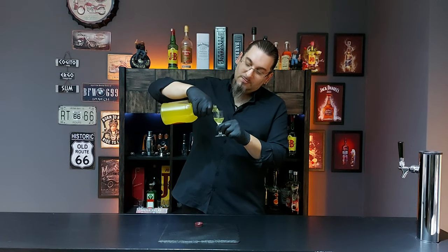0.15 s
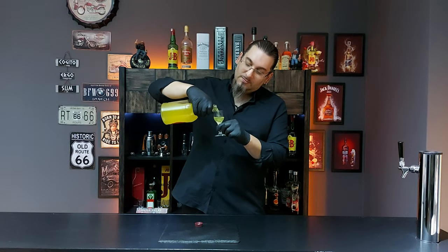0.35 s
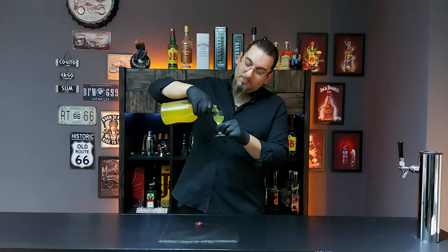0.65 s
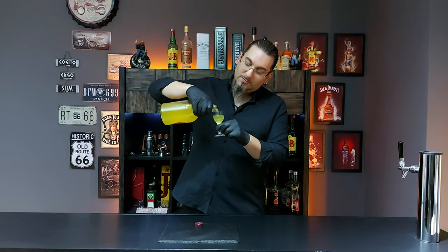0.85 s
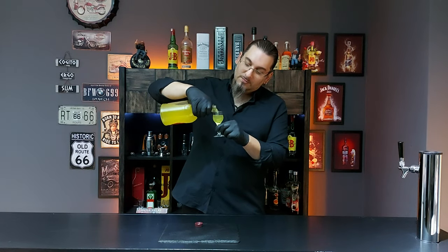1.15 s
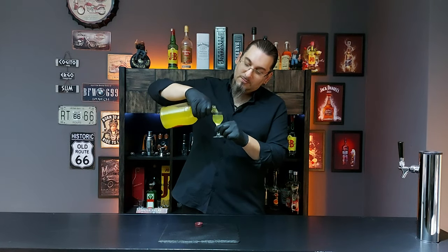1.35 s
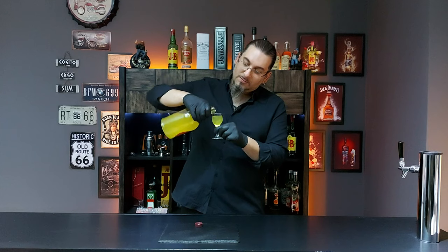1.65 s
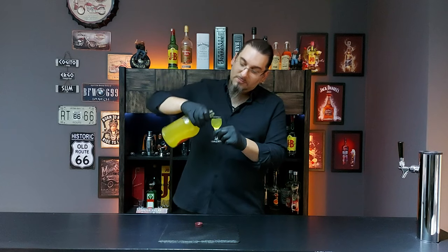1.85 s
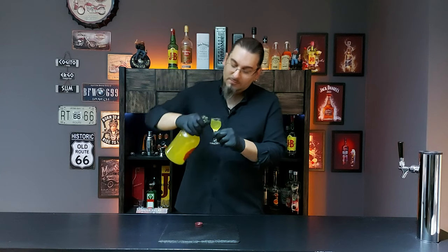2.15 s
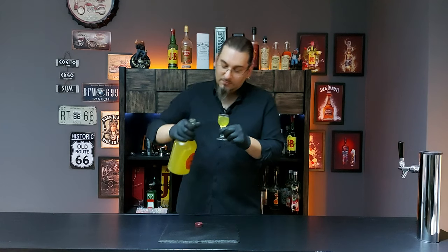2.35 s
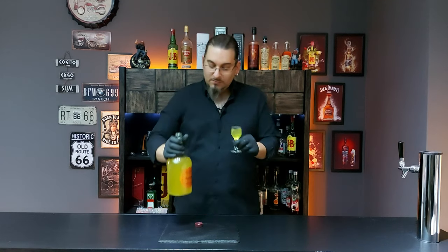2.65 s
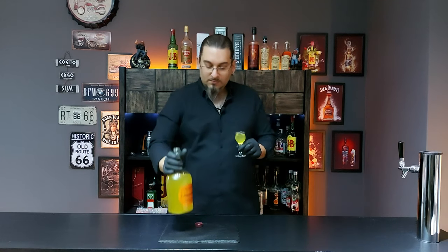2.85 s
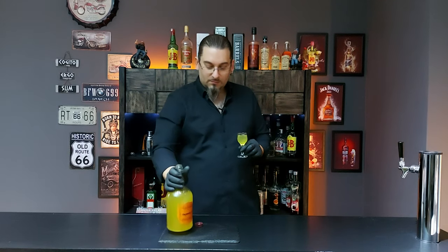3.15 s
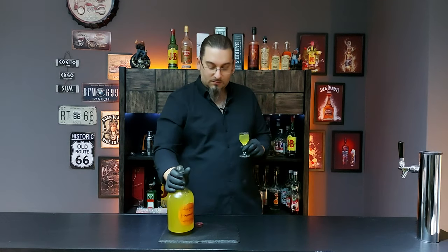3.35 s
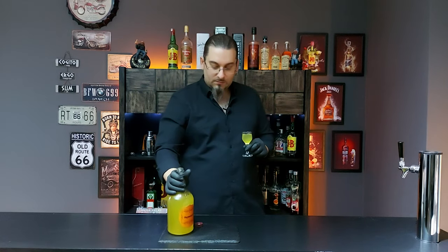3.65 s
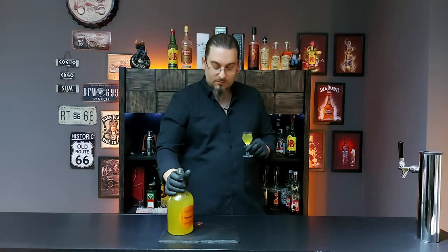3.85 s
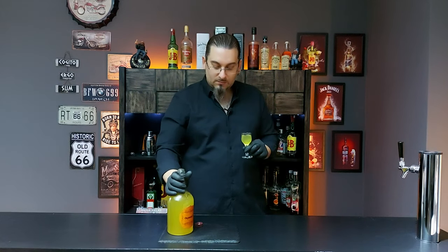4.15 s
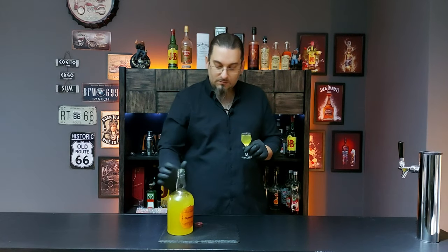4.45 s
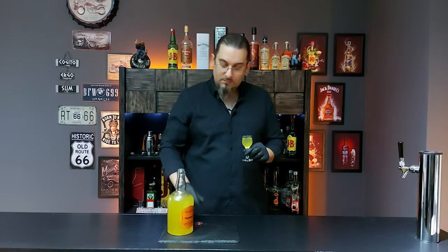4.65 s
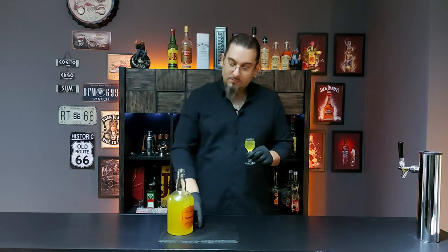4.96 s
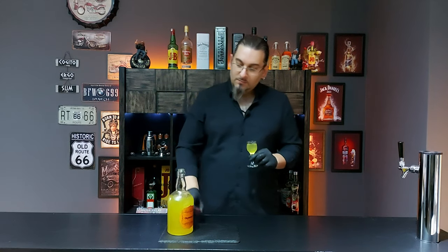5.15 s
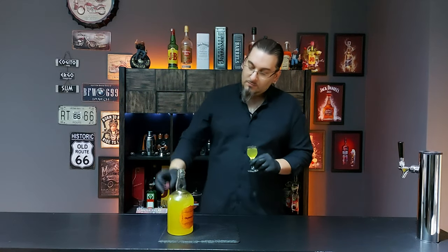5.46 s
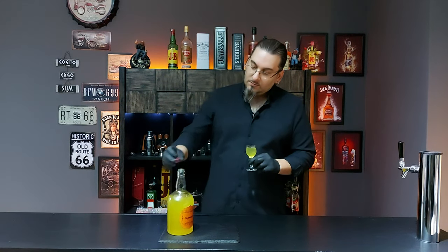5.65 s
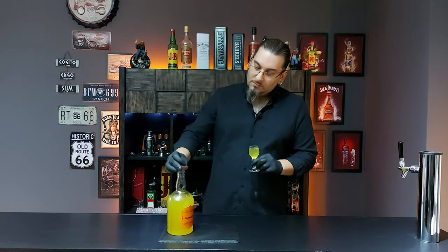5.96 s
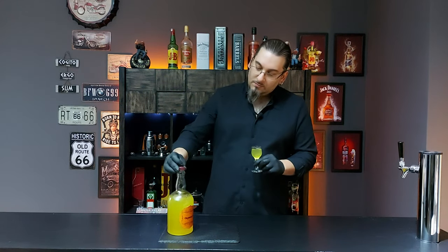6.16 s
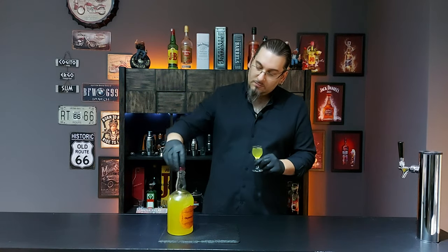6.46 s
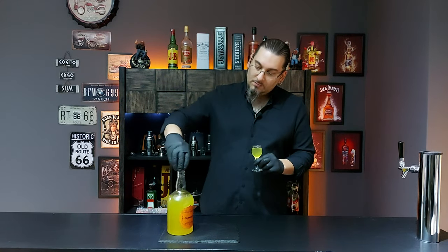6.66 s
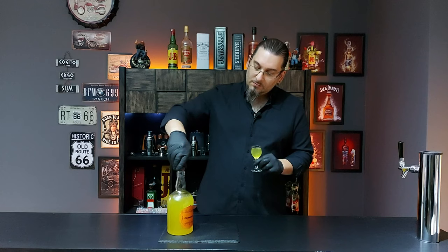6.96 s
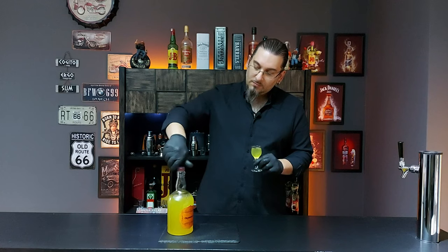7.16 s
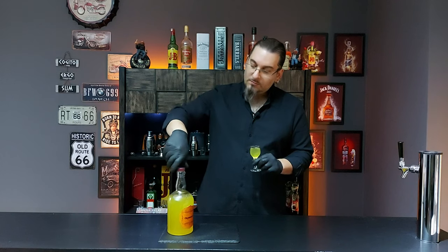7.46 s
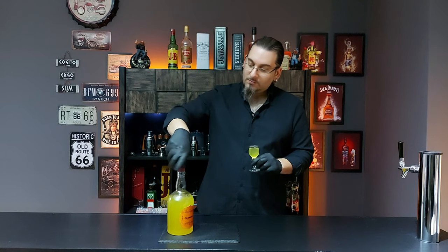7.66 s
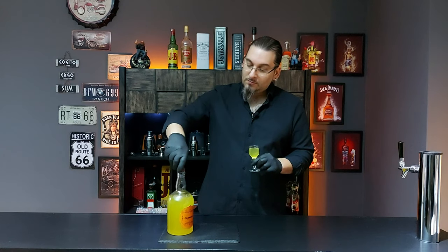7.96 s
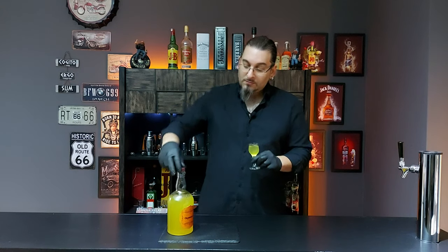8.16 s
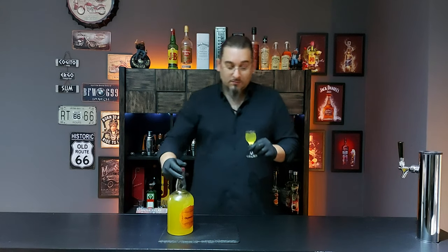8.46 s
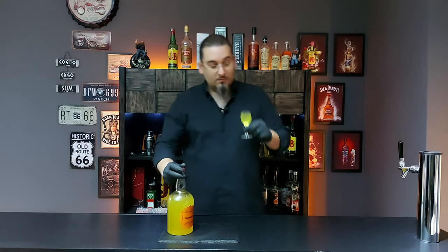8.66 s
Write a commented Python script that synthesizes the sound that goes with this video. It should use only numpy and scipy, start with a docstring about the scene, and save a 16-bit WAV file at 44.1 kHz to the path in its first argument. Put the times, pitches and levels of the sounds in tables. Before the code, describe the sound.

About seven quick glugs with wet, ringing bubbles fade into a small plop, then a clear glass clink. After a rustling pause, two heavy thumps on the counter, the second knockier. Small clicks and a brief scrape follow as the cap is picked up and pressed on, with muffled bumps and sleeve movement. Close microphone, slightly dull treble, small room with faint rumble and hiss.

```python
"""Liqueur glugs from a big bottle into a small glass, close to the microphone, in a small bar room.
The neck clinks on the glass, the bottle lands on the counter in two thumps, and the cap is picked up and
pressed on with light clicks and soft thuds; a shirt rustles and the room rumbles and hisses faintly.
Liquid is made of swelling sines and ringing bubbles, solids of decaying modes plus noise cracks,
cloth and air of coloured noise under slow level curves."""
import sys
import numpy as np
from scipy import signal
from scipy.fft import irfft
from scipy.io import wavfile

SR = 44100
rng = np.random.default_rng(int(sys.argv[2]) if len(sys.argv) > 2 else 0)


def bounce(signal):
    """Save signal as a 16-bit WAV file at the path given by the first command-line argument."""
    frames = np.transpose(np.atleast_2d(signal))
    limited = np.clip(frames, -1, 1)
    pcm = np.round(limited * 32767).astype(np.int16)
    wavfile.write(sys.argv[1], SR, pcm)


N = 388080
T = np.arange(SR) / SR  # one second after an onset
TIME_S = np.arange(N) / SR

# Low rumble of the room, two stretches. Each row: time in seconds, level in dB before a common lift.
RUMBLE_LEVEL = [
    [(0.0, -68), (1.14, -78), (1.63, -80), (3.0, -71), (3.3, -72.5), (3.9, -68.5)],
    [(4.65, -73), (5.18, -61.5), (5.75, -80), (6.63, -64.5), (6.85, -70.5), (8.8, -63)],
]
# Rumble spectrum. Each row: frequency in Hz, level in dB.
RUMBLE_SPECTRUM = [(20, -19), (35, -13), (52, 8.5), (68, 2), (90, -6), (130, -9), (300, -23), (1000, -45.5),
                   (3000, -63)]
# Hiss spectrum of the air. Each row: frequency in Hz, level in dB.
HISS_SPECTRUM = [(100, 11), (400, 6), (1000, 1.5), (2000, -3), (4200, -6), (5800, 2.5), (7600, -8.5)]
RUMBLE_LIFT_DB, RUMBLE_WAVER_DB, AIR_HISS_DB = 5, 1, -77
ROOM_T60_S = 0.39
TOP_HZ = 7750

# Arm movements that rustle the shirt. Each row: time of greatest speed in seconds, rise in seconds,
# fall in seconds, hiss level in dB, level of the rustle's body in dB.
ARM_MOVES = [(2.6, .56, 0.37, -59.5, -59), (3.17, 0.085, 0.13, -72, -73), (4.46, 0.084, 0.23, -66, -69),
             (4.879, 0.082, 0.071, -69.5, -99), (5.5, 0.5, 0.29, -63, -62), (6.2, .11, 0.46, -65, -63),
             (6.97, .2, 0.31, -69, -71.5), (7.58, 0.17, 0.33, -69, -68.5), (8.3, 0.19, 0.27, -62.5, -58),
             (8.7, 0.31, 0.3, -57.5, -57.5)]
# Spectra of the rustle. Each row: frequency in Hz, level in dB.
SHIRT_HISS_SPECTRUM = [(1000, -16), (1600, 0), (2500, 2.5), (3500, -1.5), (4500, 0), (6000, 2.5),
                       (7600, -3)]
SHIRT_BODY_SPECTRUM = [(40, 2.5), (120, 6.5), (250, 2), (450, 1), (720, 5), (1050, 1), (1500, -9),
                       (3000, -26)]
# Tiny snaps of glove and cloth. Each row: start in seconds, level in dB.
SNAPS = [(5.184, -45), (8.508, -44)]

# Slips of the cap dragged off the counter. Each row: time of the peak in seconds, level in dB.
SCRAPES = [(5.046, -47), (5.065, -42)]
# Scrape spectrum. Each row: frequency in Hz, level in dB.
SCRAPE_SPECTRUM = [(300, -13), (1050, -11.5), (1550, 3), (2050, -4), (2450, -3.5), (3100, -10),
                   (3900, -2.5), (4800, -12), (7600, -22)]
SCRAPE_RISE_S, SCRAPE_FALL_S = 0.0097, 0.012
# Cap against the neck. Each row: start in seconds, level in dB, brightness (low-pass) in Hz,
# ring relative to the crack in dB.
CAP_CLICKS = [(4.443, -45.5, 5000, -2.5), (4.999, -38.5, 910, 3.5), (6.126, -43, 4080, -6),
              (6.141, -43, 4940, 3.5), (6.183, -37.5, 4900, -1.5), (6.348, -52, 6000, 6.5),
              (6.513, -37, 6000, -7), (7.204, -48.5, 1790, 3), (7.249, -29.5, 3540, 1.5),
              (7.457, -38, 4470, -4), (7.480, -29.5, 3120, -10), (7.615, -53, 3480, 5)]
# Cap modes, detuned at each touch. Each row: nominal frequency in Hz, level in dB, T60 in seconds.
CAP_MODES = [(944, -14.5, 0.043), (1900, -13, 0.038), (1880, -7.5, 0.014), (2450, -7.5, 0.02),
             (2792, -5, 0.034), (4130, -12, 0.015)]
# Cap crack spectrum. Each row: frequency in Hz, level in dB.
CAP_CRACK_SPECTRUM = [(100, -7.5), (300, -2), (900, -1), (1300, -11), (2000, 4), (3500, -5), (5000, -4.5),
                      (6800, 3.5), (7800, -6)]
FIRM_CLICK_DB = -34  # louder than this, the cap snaps home
GRAZE_S, GRAZE_DB = .006, -9.5  # graze on the neck: lead before the snap, level relative to it

# Bottle on the counter. Each row: start in seconds, level in dB, brightness (low-pass) in Hz,
# knock relative to the boom in dB.
BLOWS = [(3.972, -12.5, 1638, -21), (4.198, -11.5, 1970, 2), (4.972, -46, 146.5, -7),
         (6.302, -38, 544, -3.5), (6.544, -42.5, 260, -12), (7.106, -41, 560, -9), (7.225, -47.5, 174, -4),
         (7.508, -46, 196, 7), (7.762, -30, 706, -10.5), (7.921, -48.5, 1200, 7.5), (8.018, -47, 1200, 2),
         (8.303, -33, 478, -4.5), (8.642, -40, 450, -1)]
# Counter modes, boom below and knock above the split. Each row: frequency in Hz, level in dB, T60 in seconds.
COUNTER_MODES = [(55, -16, .55), (88, -13, .5), (123, -15, .48), (147, -6, .38), (174, 0, .22),
                 (203, -4, .1), (262, -19, .48), (286, -21, .35), (344, -17, .32), (372, -16, .3),
                 (406, -13, .3), (447, -21, .42), (505, -4, .15), (575, -13, .2), (605, -9, .2),
                 (652, -14, .16), (1600, -16, .13), (1985, -29, .45)]
# Dense higher modes of the counter as noise. Each row: frequency in Hz, level in dB.
COUNTER_WASH_SPECTRUM = [(30, -29), (60, -9.5), (110, -5), (180, 3), (300, -4), (560, -7.5), (750, -16.5),
                         (1500, -12.5), (2300, -23), (4000, -24.5), (7800, -25.5)]
BOOM_KNOCK_SPLIT_HZ = 380
FLAT_KNOCK_DB = -3  # less knock than this: the blow lands on the edge of the base
ROCK_S, ROCK_DB, ROCK_DULLING = .038, -5, 0.54  # from one strike of the rocking bottle to the next
# low swell after a blow: delay, level offset, and the blow level at which it stops growing
LATE_BOOM_S, LATE_BOOM_DB, SOFT_BLOW_DB = .055, -31.5, -31.5

# Glass struck by the neck. Each row: frequency in Hz, relative level in dB, T60 in seconds.
GLASS_MODES = [(2002, -27, .3), (2163, -35, .18), (2613, -32, .09), (2876, -29, .08), (2931, -24, .08),
               (3316, -21.5, .17), (3384, -21, .13), (3482, -41, .3), (3770, -34, .12), (4120, -36, .11),
               (4345, -30, .2), (4472, -27, .16), (6680, -35, .1), (7154, -33, .18)]
# Clink crack spectrum. Each row: frequency in Hz, level in dB.
CLINK_CRACK_SPECTRUM = [(100, -26.5), (400, -14.5), (800, 1), (1700, 4), (3200, 5.5), (5200, 1),
                        (6000, -4.5), (7800, -19)]

# Air gulped through the neck. Each row: pinch-off in seconds, gulp level in dB, gulp frequency in Hz
# at the crest of its swell, lead of that crest before pinch-off in seconds, ping frequency in Hz.
GLUGS = [(0.099, -39, 91.5, 0.0028, 1018), (.254, -50, 68, 0.0084, 960), (0.445, -43, 106, 0.0057, 1014),
         (0.652, -45.5, 112.7, 0.013, 1062), (0.863, -41, 115.6, 0.0172, 1058),
         (1.069, -41, 109, 0.01, 1040), (1.265, -46.5, 110, 0.014, 1000)]
PING_DB = -33  # at full flow
POUR_S, FLOW_DROP_DB, FLOW_CURVE = 1.3, 20.5, 2.1  # pour length, fall of the flow over it, lateness of the fall
# Bubbles that sweep up as they rise in the glass. Each row: start in seconds, start frequency in Hz,
# target frequency in Hz (the sweep stops at 0.94 of it), length in seconds, level in dB.
SWEEPS = [(0.098, 468, 992, .029, -37.5), (0.255, 351, 1010, .039, -43.5)]
# Bubbles bursting at the surface, broadly higher as the glass fills. Each row: start in seconds,
# level in dB, frequency in Hz.
BURSTS = [(.022, -35.5, 1685), (0.083, -41.5, 1620), (.141, -43, 1545), (0.242, -38.5, 1790),
          (0.336, -35, 1946), (.347, -35, 1680), (.401, -39, 1990), (.415, -40, 2060), (.496, -49, 1850),
          (.607, -44.5, 2015), (.622, -45.5, 1915), (.752, -47, 2120), (.791, -54.5, 1990),
          (0.913, -58.5, 2470), (1.333, -58.5, 2350)]
BURST_T60_S = 0.029
# Hollow neck as the stream breaks off. Each row: frequency in Hz, level in dB, T60 in seconds.
NECK_MODES = [(173, -51, 0.24), (1300, -57.5, 0.046), (1907, -58, 0.25), (3400, -57, 0.049)]


def undb(db):
    """Decibels to gain."""
    return 10 ** (np.asarray(db) / 20)


def add(out, start_s, sound):
    """Mix a sound in at a time."""
    start = int(start_s * SR)
    out[start:start + len(sound)] += sound[:len(out) - start]


def fade(t60_s):
    """Exponential decay by 60 dB in t60_s."""
    return np.exp(-np.log(1000) * T / t60_s)


def noise(spectrum, size):
    """Random-phase noise of unit deviation with a spectrum of (Hz, dB) points."""
    hz, db = np.transpose(spectrum)
    bin_hz = np.arange(size // 2 + 1) * SR / size
    gain = undb(np.interp(np.log(bin_hz + 1), np.log(hz), db)) * (bin_hz < SR / 5)
    x = irfft(gain * np.exp(2j * np.pi * rng.random(len(bin_hz))), size)
    return x / x.std()


def ring(modes):
    """Struck modes, all set off together."""
    return sum(undb(db) * fade(t60_s) * np.sin(2 * np.pi * hz * T) for hz, db, t60_s in modes)


def soften(x, cutoff_hz):
    """A softer contact takes the treble away."""
    return signal.sosfilt(signal.butter(2, min(cutoff_hz, SR / 3), fs=SR, output="sos"), x)


def cut_bass(x, cutoff_hz):
    """Takes the bass away below the cutoff."""
    return signal.sosfilt(signal.butter(2, cutoff_hz, "high", fs=SR, output="sos"), x)


def walk(rate_hz):
    """Slow chance with a spread near 1: random knots, rate_hz per second, joined by lines."""
    knots = rng.standard_normal(N // 100)
    return np.interp(TIME_S * rate_hz, np.arange(len(knots)), knots)


def sine(hz):
    """A tone along a pitch curve."""
    return np.sin(2 * np.pi * np.cumsum(hz) / SR)


def swish(peak_s, rise_s, fall_s):
    """Speed of a movement that gathers, peaks at 1 and dies away."""
    lag_s = TIME_S - peak_s
    return np.exp(-(lag_s / np.where(lag_s < 0, rise_s, fall_s)) ** 2)


def room(x, wet_db):
    """Direct sound plus a diffuse tail that builds up as the walls answer."""
    build_up = np.clip((T - .005) / 0.0095, 0, 1)
    tail = noise([(60, -3.0), (300, 3.5), (2000, -4), (7800, -1.5)], len(T)) * fade(ROOM_T60_S) * build_up
    return x + undb(wet_db) * signal.fftconvolve(x, tail / np.linalg.norm(tail))[:N]


def air():
    """Low rumble of the room, wavering slowly, and a faint, steady hiss."""
    rumble_db = np.interp(TIME_S, *np.transpose(np.vstack(RUMBLE_LEVEL))) + RUMBLE_LIFT_DB
    rumble = undb(rumble_db + RUMBLE_WAVER_DB * walk(rate_hz=12)) * noise(RUMBLE_SPECTRUM, N)
    return rumble + undb(AIR_HISS_DB) * noise(HISS_SPECTRUM, N)


def shirt():
    """Cloth slides on cloth as fast as the arm moves: a grainy hiss over a duller body, with a few snaps."""
    hiss, body = 0, 0
    for peak_s, rise_s, fall_s, hiss_db, body_db in ARM_MOVES:
        speed = swish(peak_s, rise_s, fall_s)
        hiss = hiss + undb(hiss_db) * speed
        body = body + undb(body_db) * speed
    grip_db = walk(rate_hz=40) + 0.8 * walk(rate_hz=30)
    out = hiss * undb(grip_db) * noise(SHIRT_HISS_SPECTRUM, N)
    out += body * undb(0.68 * grip_db) * noise(SHIRT_BODY_SPECTRUM, N)
    for start_s, db in SNAPS:
        snap = fade(0.023) * noise([(1000, -23), (3000, -6), (6000, -1.5)], len(T))
        add(out, start_s, undb(db) * snap)
    return out


def cap():
    """The cap scrapes off the counter and ticks on the neck; every touch rings it a little differently."""
    drag = sum(undb(db) * swish(peak_s, SCRAPE_RISE_S, SCRAPE_FALL_S) for peak_s, db in SCRAPES)
    out = drag * undb(1.6 * walk(rate_hz=640)) * noise(SCRAPE_SPECTRUM, N)
    for start_s, db, bright_hz, ring_db in CAP_CLICKS:
        modes = np.array(CAP_MODES)
        modes[:, 0] *= 1 + 0.03 * rng.standard_normal(len(modes))
        crack = noise(CAP_CRACK_SPECTRUM, len(T)) * fade(0.035)
        add(out, start_s, undb(db) * soften(undb(ring_db) * ring(modes) + crack, bright_hz))
        if db > FIRM_CLICK_DB:
            add(out, start_s - GRAZE_S, undb(db + GRAZE_DB) * soften(crack, bright_hz))
    return room(out, wet_db=-7)


def rocking(start_s, db, bright_hz, knock_db, count):
    """A blow on the edge of the base rocks the bottle: it strikes again, each time weaker and duller."""
    strikes = count if knock_db < FLAT_KNOCK_DB else 1
    return [(start_s + k * ROCK_S, db + k * ROCK_DB, bright_hz * ROCK_DULLING ** k, knock_db)
            for k in range(strikes)]


def counter():
    """Blows ring the counter's main modes and a dense wash; an edge booms, the flat base also knocks."""
    out = np.zeros(N)
    boom = ring([mode for mode in COUNTER_MODES if mode[0] < BOOM_KNOCK_SPLIT_HZ])
    knock = ring([mode for mode in COUNTER_MODES if mode[0] > BOOM_KNOCK_SPLIT_HZ])
    late_boom = noise([(50, -25), (85, 0.5), (120, -2.5), (180, -18), (400, -39), (1500, -71.5)], N)
    for blow in BLOWS:
        for start_s, db, bright_hz, knock_db in rocking(*blow, count=3):
            wash_fade = undb(-11.0) * fade(0.43) + undb(-9.0) * fade(0.076)
            wash = noise(COUNTER_WASH_SPECTRUM, len(T)) * wash_fade
            modes = undb(-5) * (boom + undb(knock_db) * knock)
            add(out, start_s, undb(db) * soften(modes + wash, bright_hz))
        # the lows come late and stay; a soft blow pushes longer, so it loses less of them
        start_s, db = blow[:2]
        late_db = LATE_BOOM_DB + .5 * min(db, SOFT_BLOW_DB)
        out += undb(late_db) * swish(start_s + LATE_BOOM_S, .03, .1) * late_boom
    return room(cut_bass(out, 88), wet_db=-13.5)


def clink():
    """The neck catches the rim, ringing the glass modes, and touches it once more with a crack."""
    out = np.zeros(N)
    # the contact lasts a moment, so the ring builds up
    add(out, 2.109, undb(1.5) * ring(GLASS_MODES) * (1 - undb(-2.5) * fade(0.005)))
    for start_s, db in [(2.109, -21.5), (2.121, -22.5)]:
        crack_fade = fade(0.022) + undb(-16.0) * fade(0.43)
        add(out, start_s, undb(db) * noise(CLINK_CRACK_SPECTRUM, len(T)) * crack_fade)
    return room(cut_bass(out, 330), wet_db=-13.0)


def bubble(hz, t60_s, rise, attack_s):
    """A ringing bubble whose pitch drifts by the fraction rise as it dies; envelope peak 1."""
    swell = (1 - np.exp(-(T / attack_s) ** 2)) * fade(t60_s)
    return swell / swell.max() * sine(hz * (1 + rise * np.minimum(T / t60_s, 1)))


def flow_db(time_s):
    """The stream dwindles, faster and faster, as the bottle is levelled."""
    return -FLOW_DROP_DB * (time_s / POUR_S) ** FLOW_CURVE


def gulps(out):
    """Air swells in the neck and rises in pitch until its bubble pinches off with a ping."""
    lead_s = .07
    for pinch_s, gulp_db, gulp_hz, swell_s, ping_hz in GLUGS:
        before_s, after_s = np.minimum(T - lead_s, 0), np.maximum(T - lead_s, 0)
        swell = np.exp(-((before_s + swell_s) / (0.0072 + 0.93 * swell_s)) ** 2 - after_s / 0.0021)
        gulp = swell * sine(gulp_hz * np.exp((before_s + swell_s) / 0.051))
        add(out, pinch_s - lead_s, undb(gulp_db) * gulp)
        ping = bubble(ping_hz, t60_s=0.051, rise=-0.016, attack_s=0.0018)
        # the pinch-off also jolts the liquid and rings the neck
        jolt = undb(6.5) * soften(fade(0.0087), 440)
        jolt += undb(-34.5) * bubble(3280, t60_s=0.079, rise=0.0084, attack_s=0.00046)
        add(out, pinch_s, undb(PING_DB + flow_db(pinch_s)) * ping + undb(gulp_db) * jolt)


def rising_bubbles(out):
    """Bubbles sweep up in pitch as they rise and throw up a fine spray that ticks on the glass."""
    for start_s, start_hz, end_hz, length_s, db in SWEEPS:
        u = T / length_s
        swell = np.minimum(u, 1) ** 0.91 * np.exp(-np.maximum(u - 1, 0) * 3)
        sweep_hz = np.minimum(start_hz + (end_hz - start_hz) * u ** 1.223, .94 * end_hz)
        add(out, start_s, undb(db) * swell * sine(sweep_hz))
        for lag, pitch in rng.random((6, 2)):
            tick = bubble(4500 + 2900 * pitch, t60_s=0.0076, rise=0, attack_s=0.00036)
            add(out, start_s + 0.046 * lag, undb(-57.5) * tick)


def bursting_bubbles(out):
    """At the surface the film rings, tears with a wet splutter and sheds a few smaller bubbles."""
    splutter_spectrum = [(700, -23), (1300, 9.5), (2300, -5), (3200, -17), (4400, -22.5),
                         (6000, -5.0), (7800, -21.5)]
    for start_s, db, hz in BURSTS:
        splutter = fade(0.039) * noise(splutter_spectrum, len(T))
        burst = bubble(hz, BURST_T60_S, rise=0.093, attack_s=0.0011)
        add(out, start_s, undb(db) * burst + undb(.5 * db - 38) * splutter)
        for lag, pitch in rng.random((4, 2)):
            small = bubble(hz * (0.75 + .6 * pitch), t60_s=0.028, rise=0.2, attack_s=0.00081)
            add(out, start_s + 0.029 * (lag - .3), undb(0.63 * db - 31) * small)


def last_drop(out):
    """The last drop falls back into the bottle: a plop that sags in pitch, a neck ring and spray."""
    plop_hz = 435 * (1 + 0.066 * fade(0.15) + 0.016 * walk(rate_hz=63)[:len(T)])
    plop = undb(-43.5) * fade(0.22) * sine(plop_hz)
    spray = undb(-58) * fade(0.12) * noise([(1000, -30), (5800, 20), (7600, 10)], len(T))
    add(out, 1.481, (plop + ring(NECK_MODES)) * (1 - fade(0.0056)) + spray)


def pour():
    """Gulped air, rising and bursting bubbles and a last drop, heard in the room."""
    out = np.zeros(N)
    gulps(out)
    rising_bubbles(out)
    bursting_bubbles(out)
    last_drop(out)
    return room(out, wet_db=-13)


def scene():
    """All sources at one microphone."""
    return (air() + shirt() + cap() + counter() + clink() + pour())[None]


def record(dry):
    """A narrow-band microphone link cuts the top."""
    return signal.sosfilt(signal.ellip(10, .2, 70, TOP_HZ, fs=SR, output="sos"), dry)


dry = scene()
out = record(dry)
bounce(out)
```